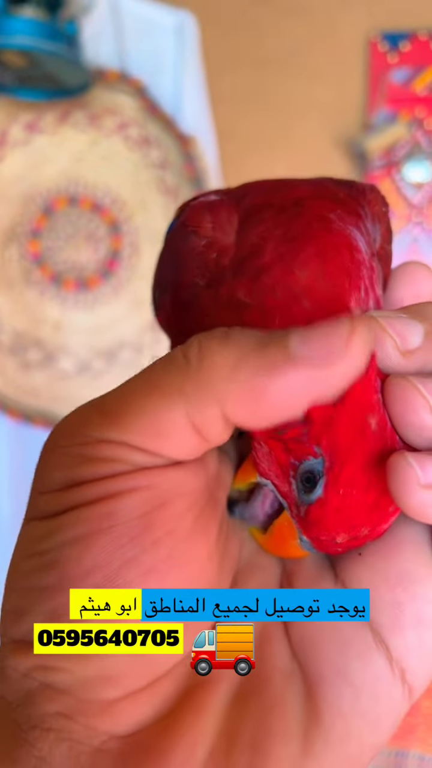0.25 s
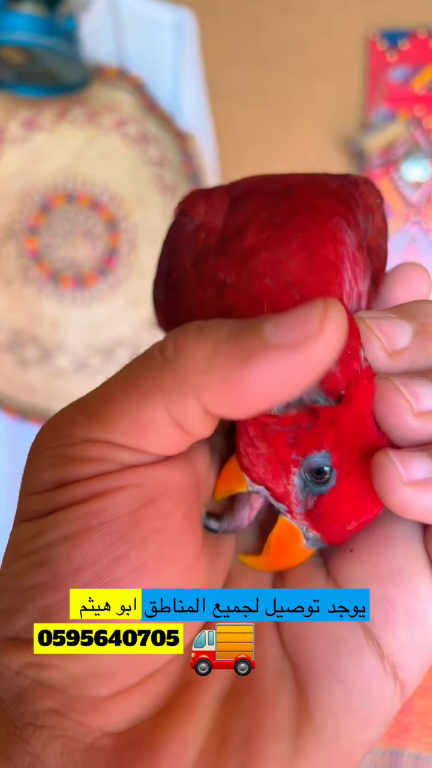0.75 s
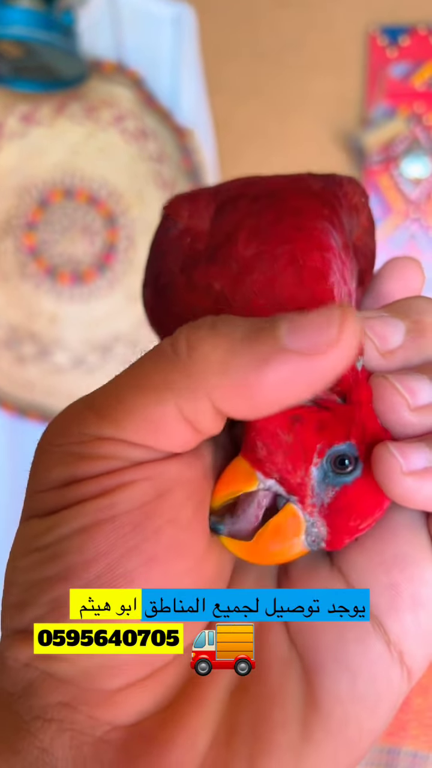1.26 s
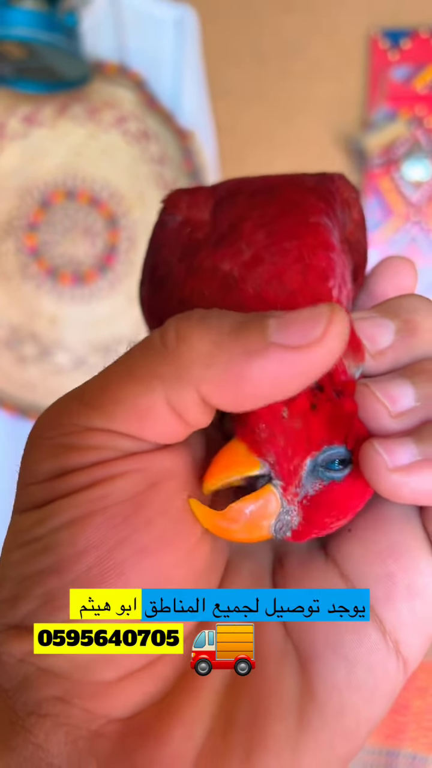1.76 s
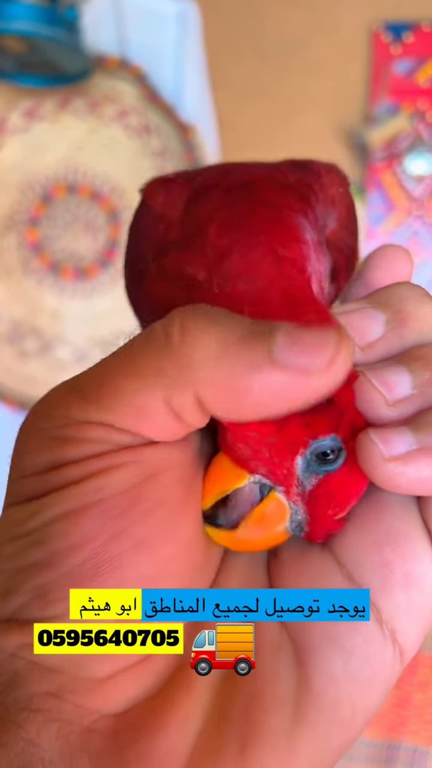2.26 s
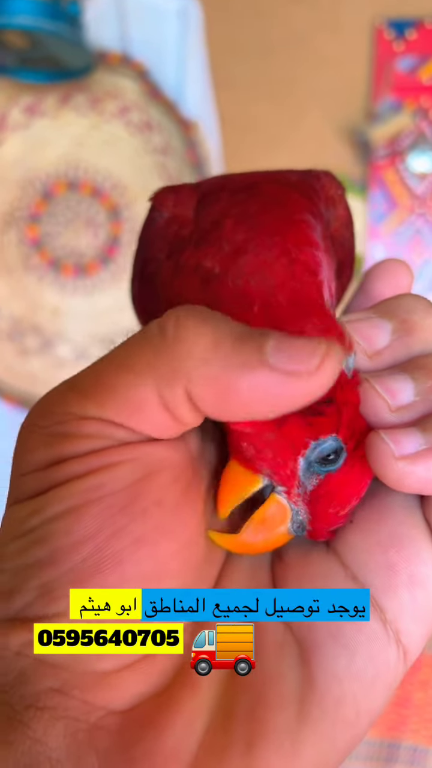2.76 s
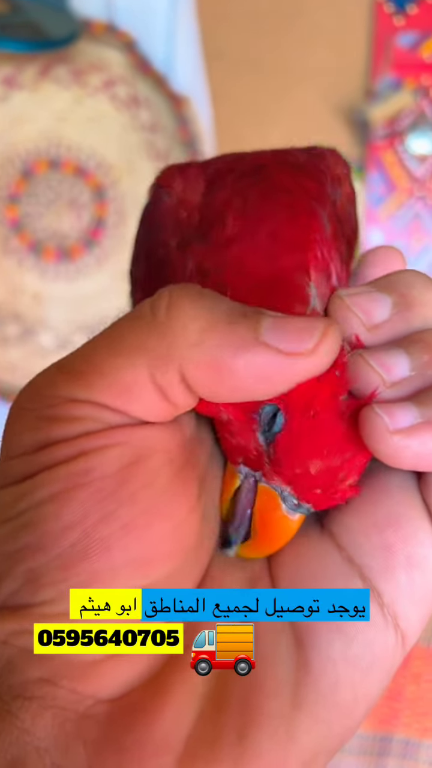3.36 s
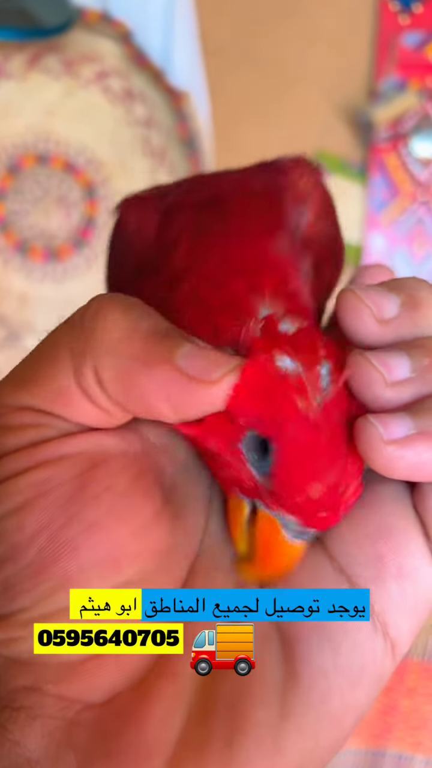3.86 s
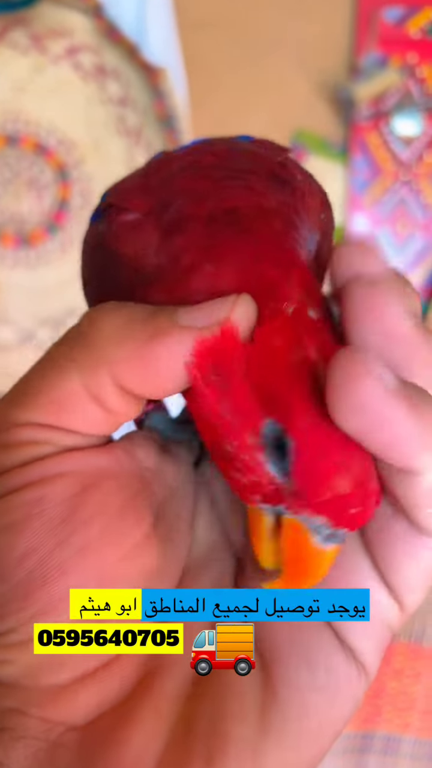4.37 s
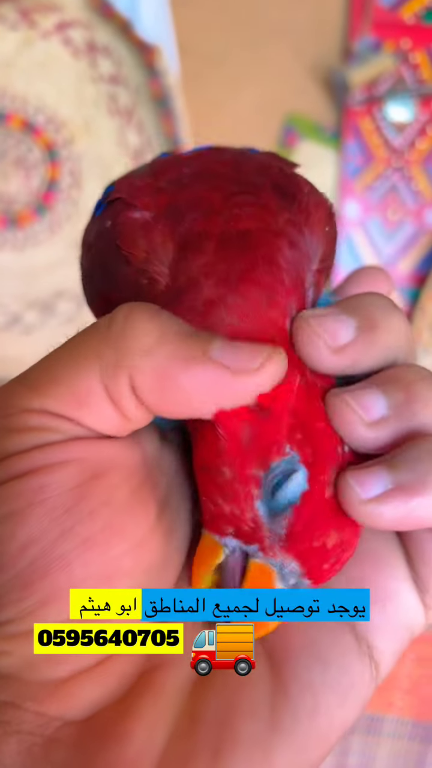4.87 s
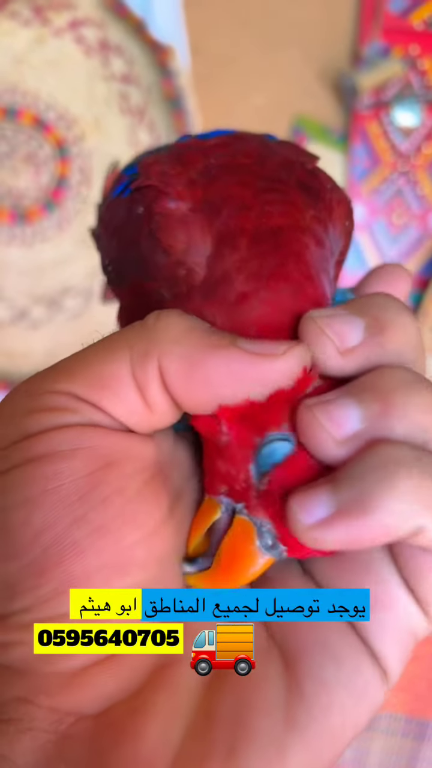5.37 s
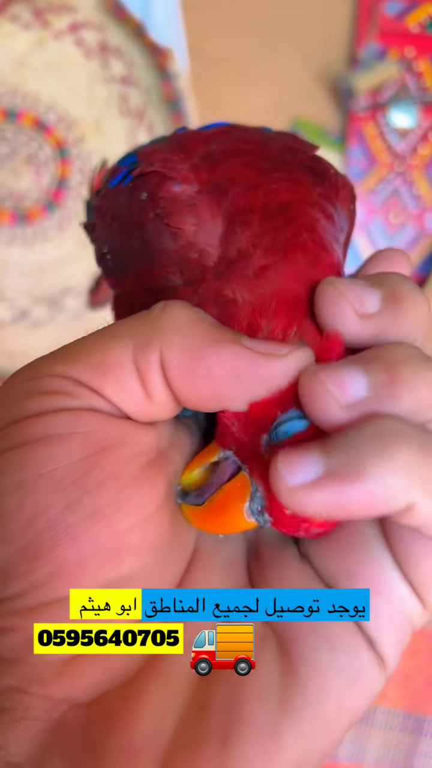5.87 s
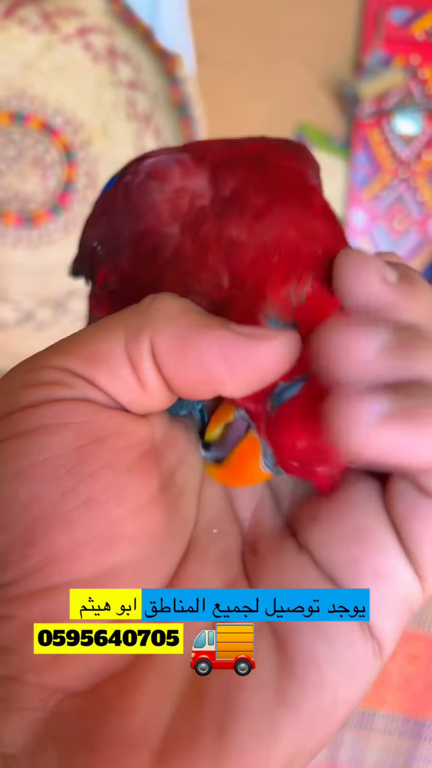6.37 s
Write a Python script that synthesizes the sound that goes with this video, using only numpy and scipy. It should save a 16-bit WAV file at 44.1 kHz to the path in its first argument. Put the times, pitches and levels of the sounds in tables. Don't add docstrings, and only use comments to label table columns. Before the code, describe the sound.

Close, loud and slightly thin on a phone: short raspy parrot calls, some breaking into a rough half-pitch, echo off hard room walls. After about two seconds of calling only fan rumble and one soft call remain, then rough cries and high squeals crowd together. Later shrieks come in a run, followed by soft handling thuds, light feather ticks and a final sharp screech.

```python
import sys
import numpy as np
from scipy import signal
from scipy.fft import rfft, irfft
from scipy.io import wavfile
from scipy.ndimage import uniform_filter1d

SR = 44100
rng = np.random.default_rng(int(sys.argv[2]) if len(sys.argv) > 2 else 0)


def attenuation_scalar(level_db):
    decades = np.asarray(level_db, float) / 20
    return 10 ** decades


def dump_mix(stems):
    frames = np.atleast_2d(stems).T
    limited = np.clip(frames, -1, 1)
    pcm = np.round(limited * 32767).astype(np.int16)
    wavfile.write(sys.argv[1], SR, pcm)


N = 292824
STEP = 32

# pitch_hz, level_db (per Hz)
RASP_TONE = [(350, -51.5), (600, -11), (1030, -16.5), (1280, -8), (1960, -3), (2440, -2.5), (3890, 3),
             (7110, -6), (8860, -21.5), (11500, -21), (16000, -48.5)]


def unit(x):
    return x / np.sqrt(np.mean(x ** 2))


def colour(x, points):
    hz, db = np.transpose(points)
    f = np.log(np.arange(len(x) // 2 + 1) * SR / len(x) + 1)
    return irfft(rfft(x) * attenuation_scalar(np.interp(f, np.log(hz), db)), len(x))


def band(x, lo_hz, hi_hz):
    return signal.sosfilt(signal.butter(2, [lo_hz, min(hi_hz, SR / 2.1)], "band", fs=SR, output="sos"), x)


def walk(rate_hz):
    once = band(rng.standard_normal(N), rate_hz / 2, rate_hz * 2)
    return unit(band(once, rate_hz / 2, rate_hz * 2))


def cooler():
    # pitch_hz, level_db (per Hz)
    air_tone = [(18, -14), (30, -6), (75, 0), (124, -16.5), (227, -17.5), (328, -20), (512, -20),
                (988, -30.5), (3140, -44.5), (3670, -53), (4780, -51.5), (7270, -50), (7870, -59),
                (13000, -52), (16000, -57.5)]
    # pitch_hz, level_db
    motor_lines = [(543.5, -56.5), (117.8, -52.5), (51.6, -46.5)]
    t = np.arange(N) / SR
    out = unit(colour(rng.standard_normal(N), air_tone)) * attenuation_scalar(-38 + 1.0 * walk(1.25))
    for hz, db in motor_lines:
        out = out + attenuation_scalar(db + 2 + 0.95 * walk(2.7)) * np.sin(2 * np.pi * hz * t)
    return out


def handling():
    # start_s, level_db, pitch_hz, t60_s
    finger_thuds = [(0.449, -36, 340, 0.29), (2.859, -31.5, 375, 0.095), (3.328, -38, 316.7, 0.19),
                    (3.888, -21, 423.6, 0.085), (4.219, -38.5, 500, 0.21), (5.314, -49, 450.4, 0.13),
                    (6.03, -25, 410, 0.071), (6.353, -36, 467.7, 0.13), (6.539, -36, 353, 0.2),
                    (6.6, -29, 293, 0.064)]
    # start_s, level_db, pitch_hz, t60_s
    skin_rubs = [
        (2.23, -49, 1280, 0.2),
        (2.329, -42.5, 1350, 0.16),
        (4.2, -37.5, 192, 0.38),
        (4.301, -41.5, 1303, 0.3),
        (6.02, -44.5, 1093, 0.3),
        (5.299, -23, 434, 0.093),
    ]
    # start_s, level_db
    shaft_ticks = [
        (5.4755, -34.5),
        (5.656, -34.5),
        (5.8628, -38.5),
        (5.9863, -44.5),
    ]
    out, t = np.zeros(N + SR), np.arange(SR // 2) / SR
    for s, db, hz, t60 in finger_thuds + skin_rubs:
        rub = unit(band(rng.standard_normal(len(t)), hz * 0.67, hz * 1.36))
        rub = rub * attenuation_scalar(-60 * t / max(t60, .02)) * np.minimum(t / 0.027, 1)
        out[int(s * SR):][:len(t)] += attenuation_scalar(db + 5.5) * rub
    for s, db in shaft_ticks:
        snap = unit(colour(rng.standard_normal(len(t)), [(3000, -24.0), (8000, -11), (10500, -0.5), (16000, -3)]))
        out[int(s * SR):][:len(t)] += attenuation_scalar(db) * snap * attenuation_scalar(-60 * t / 0.016)
    return out[:N]


def grunts():
    # start_s, length_s, pitch_hz, level_db
    low_notes = [(.2, 0.14, 765, -46), (1.55, 0.058, 1225, -46), (2.566, 0.049, 1395, -39.5),
                 (2.58, 0.076, 638, -42), (2.67, 0.049, 954, -38.5), (2.86, 0.061, 911, -44),
                 (3.1, 0.049, 967, -39.5), (3.87, 0.039, 724, -42.5), (4.04, 0.068, 938, -43),
                 (4.019, 0.081, 1211, -45.5), (3.325, 0.086, 801, -49), (4.9, 0.069, 850, -51),
                 (5.05, 0.043, 833, -49), (6.25, 0.083, 1086, -42.5)]
    out, waver = np.zeros(N), 1 + 0.074 * walk(82.0)
    for s, length, hz, db in low_notes:
        at = slice(int(s * SR), int((s + length) * SR))
        phase = np.cumsum(2 * np.pi * hz * waver[at] / SR)
        note = np.sin(phase) + 0.5 * np.sin(2 * phase)
        out[at] += attenuation_scalar(db + 8.5) * np.sqrt(np.hanning(len(phase))) * note
    return out


def pops():
    # start_s, level_db
    partings = [(0.0643, -26), (0.8737, -20.5), (1.1526, -14), (1.48, -17.5), (1.8043, -19.5),
                (4.4867, -14.5), (4.7481, -11.5), (5.0638, -9), (6.0022, -38), (6.2196, -41), (6.2392, -39)]
    out, t = np.zeros(N), np.arange(SR // 20) / SR
    for s, db in partings:
        puff = unit(colour(rng.standard_normal(len(t)), RASP_TONE))
        puff = puff * attenuation_scalar(-60 * t / 0.048) * np.minimum(t / 0.0054, 1)
        out[int(s * SR):][:len(t)] += attenuation_scalar(db - 4.5) * puff
    return out


def call(s, length, db, hz, last_hz, harsh_db, rule):
    t = np.arange(0, N + STEP, STEP) / SR - s
    rise = min(rule["attack_s"], length / 2)
    crest = rise + rule["crest"] * (length - rise)
    slip, slip_s, tail_s, onset_db = rule["slip"] * length, 0.09, .12, -35.5
    level = np.interp(t, [-rise, 0, rise, crest, length],
                      [-99, onset_db, -rule["swell_db"], 0, -rule["droop_db"]])
    level = db + level - rule["fall_db_s"] * np.maximum(t - length, 0)
    pitch = np.interp(t, [rise, length], [hz, last_hz])
    warble = np.interp(t, [rise, length], rule["warble"])
    half = harsh_db + np.interp(t, [slip, slip + slip_s], rule["half_db"])
    onset, hold, tail = rule["chaos_db"]
    chaos = np.interp(t, [0, rise, length, length + tail_s], [onset, hold + harsh_db, hold + harsh_db, tail])
    return [level, pitch, warble, rule["low_db"] + 0 * t, half, chaos]


def sagging(rows, rule):
    return [call(s, length, db, hz, hz * (1 - rule["sag"]), harsh_db, rule)
            for s, length, db, hz, harsh_db in rows]


def gliding(rows, rule):
    return [call(s, length, db, hz, last_hz, 19 * abs(np.log2(last_hz / hz)), rule)
            for s, length, db, hz, last_hz in rows]


def peeps():
    # start_s, length_s, level_db, first_hz, last_hz
    thin_notes = [
        (.775, 0.058, -38, 2265, 2000),
        (2.425, 0.045, -35, 2072, 2070),
        (2.721, 0.058, -31, 2045, 2073),
        (3.515, .08, -31.5, 2346, 2251),
        (4.97, .09, -26.5, 2120, 1698),
        (5.688, 0.048, -44.5, 2050, 2017),
    ]
    return gliding(thin_notes, dict(
        attack_s=.022, swell_db=2.5, crest=1, droop_db=1, fall_db_s=397, warble=(0.016, 0.039), low_db=-5,
        slip=.6, half_db=(-41, -30.5), chaos_db=(1, -18.5, 3)))


def rasps():
    # start_s, length_s, level_db, pitch_hz, harsh_db
    rough_calls = [(-.08, 0.098, -46.5, 2000, 4), (2.455, .09, -32, 1750, 9), (.51, .08, -21.5, 1800, -4.5),
                   (2.65, 0.081, -32.5, 1750, 16.5), (2.77, .16, -15, 2930, -2),
                   (3.185, .205, -19, 2400, 9.5), (3.585, 0.15, -19, 2700, -4.5),
                   (4.02, 0.17, -31, 1790, -5), (4.26, 0.094, -42.5, 2200, 5),
                   (5.24, 0.044, -20, 1880, -6.5), (6.215, 0.11, -29.5, 2270, -7),
                   (6.53, 0.091, -30.5, 2280, -7)]
    return sagging(rough_calls, dict(
        attack_s=.03, swell_db=3.5, crest=.75, droop_db=2, fall_db_s=216, sag=.03, warble=(.055, 0.073), low_db=-8,
        slip=0.26, half_db=(-1.5, -1), chaos_db=(29, 6.5, -5)))


def screeches():
    # start_s, length_s, level_db, pitch_hz, harsh_db
    hard_calls = [
        (.24, .105, -16, 2290, 2),
        (6.416, .065, -11.5, 2332, -0.5),
    ]
    return sagging(hard_calls, dict(
        attack_s=0.023, swell_db=9.5, crest=0.64, droop_db=2.5, fall_db_s=243, sag=.01, warble=(0.039, 0.042),
        low_db=-40, slip=0.16, half_db=(1, -4.5), chaos_db=(7.5, -7.5, -12)))


def squawks():
    # start_s, length_s, level_db, pitch_hz, harsh_db
    swelling_calls = [
        (.125, 0.067, -21, 1898, 12),
        (.585, 0.066, -12.5, 1885, 1),
        (.872, 0.15, -12.5, 2000, 6.5),
        (1.148, .13, -12.5, 1951, 2),
        (2.145, .075, -31, 2230, 7.5),
        (5.995, .12, -34, 1950, 12),
    ]
    return sagging(swelling_calls, dict(
        attack_s=.035, swell_db=6, crest=0.82, droop_db=3, fall_db_s=234.5, sag=.055, warble=(0.048, .028),
        low_db=-6.5, slip=0.77, half_db=(-24.5, -12), chaos_db=(16.5, -19, -4.5)))


def cries():
    # start_s, length_s, level_db, pitch_hz, harsh_db
    breaking_calls = [
        (.398, .115, -13.5, 1953, 2),
        (1.468, .14, -11.5, 2010, -1),
        (1.793, .11, -14, 2022, -5.5),
    ]
    return sagging(breaking_calls, dict(
        attack_s=.035, swell_db=5.5, crest=.6, droop_db=3.5, fall_db_s=237, sag=.045, warble=(.024, .034),
        low_db=-7.5, slip=0.31, half_db=(-39.5, -6.5), chaos_db=(6.5, -13, -11)))


def shrieks():
    # start_s, length_s, level_db, pitch_hz, harsh_db
    forced_calls = [
        (3.125, 0.055, -11, 2074, 11.5),
        (3.9, .1, -16, 1981, 6),
        (4.48, 0.14, -11.5, 2000, 2),
        (4.74, .165, -12, 2104, 2),
        (5.06, 0.16, -11, 2079, 0),
    ]
    return sagging(forced_calls, dict(
        attack_s=.028, swell_db=2, crest=.75, droop_db=1.5, fall_db_s=236.5, sag=.04, warble=(0.063, 0.057),
        low_db=-10, slip=.45, half_db=(-22, -12), chaos_db=(6.5, -19.5, 4.5)))


def yells():
    # start_s, length_s, level_db, pitch_hz, harsh_db
    climbing_calls = [
        (.05, .095, -27.5, 1604, 10),
        (2.53, .075, -21.5, 1958, 14),
        (3.05, .095, -16, 2010, -1),
        (3.65, .235, -13, 2000, -3.5),
    ]
    return sagging(climbing_calls, dict(
        attack_s=.03, swell_db=7, crest=.9, droop_db=1, fall_db_s=241, sag=-.065, warble=(.06, 0.056),
        low_db=-5.5, slip=0.4, half_db=(-7.5, -19.5), chaos_db=(6, -6, 8.5)))


def squeals():
    # start_s, length_s, level_db, first_hz, last_hz
    high_calls = [
        (2.76, 0.052, -18, 3370, 3110),
        (2.91, .085, -15, 2999, 3620),
        (2.985, .07, -11, 3490, 3600),
        (6.41, 0.023, -21.5, 3458, 3730),
    ]
    return gliding(high_calls, dict(
        attack_s=.018, swell_db=2.5, crest=.85, droop_db=1.5, fall_db_s=304, warble=(0.037, 0.029), low_db=-4.5,
        slip=0.71, half_db=(-13, -28), chaos_db=(-6, -20.5, -9.5)))


def syrinx():
    jump_s, change_s = .003, .012
    calls = squawks() + cries() + shrieks() + yells() + rasps() + screeches() + peeps() + squeals()
    calls = np.array(calls)
    loudest = calls[:, 0].argmax(axis=0)
    state = np.take_along_axis(calls, loudest[None, None], axis=0)[0]
    state[0] = 10 * np.log10(np.sum(attenuation_scalar(2 * calls[:, 0]), axis=0))
    state[1] = uniform_filter1d(state[1], size=max(int(jump_s * SR / STEP), 1))
    state[2:] = uniform_filter1d(state[2:], size=int(change_s * SR / STEP), axis=1)
    return [np.interp(np.arange(N) / STEP, np.arange(len(row)), row) for row in state]


def stack(phase, hz, order):
    return np.cos(order * phase + order * order) * (order * hz < 17000)


def torn(x, patchy_db, rate_hz):
    edges = 500 * 2 ** np.arange(0, 5.6, .5)
    return sum(attenuation_scalar(patchy_db * walk(rate_hz)) * band(x, lo, hi) for lo, hi in zip(edges, edges[1:]))


def warbling_tones(hz, warble, low_db, half_db):
    # pitch_hz, level_db
    throat_tone = [(500, -59), (1100, -19.5), (2000, -5), (3000, -1), (3800, 2), (4800, -3.5), (5700, -5.5),
                   (7500, -11), (8600, -18), (9500, -16.5), (12000, -18), (16000, -25)]
    flap = np.cumsum(2 * np.pi * 73. * (1 + 0.1818 * walk(12.)) / SR)
    pull = np.sin(flap) + .3 * np.sin(2 * flap) + .2 * np.cos(2 * flap) + .12 * walk(120.)
    phase = np.cumsum(np.pi * hz * (1 + warble * pull) / SR)
    low_db = np.where(hz > 2700, -8, low_db)
    main = attenuation_scalar(low_db + 7.0) * stack(phase, hz / 2, order=2)
    main = main + sum(stack(phase, hz / 2, order=k) for k in range(4, 18, 2))
    under = attenuation_scalar(np.where(hz > 2600, -12, -3)) * stack(phase, hz / 2, order=1)
    half = under + sum(stack(phase, hz / 2, order=k) for k in range(3, 18, 2))
    half = half * attenuation_scalar(2.9 * walk(37.0))
    return unit(colour(main + attenuation_scalar(half_db) * half, throat_tone)) * attenuation_scalar(2.83 * walk(80.))


def chaotic_rasp(hz):
    lurch = hz / 2 * (1 + .16 * np.tanh(walk(45.)) + .08 * walk(200.))
    wild = np.cumsum(2 * np.pi * lurch / SR)
    rasp = colour(sum(stack(wild, lurch, order=k) for k in range(1, 18)), RASP_TONE)
    return unit(torn(rasp, patchy_db=3.5, rate_hz=14.))


def beak(voice, db, half_db, chaos_db):
    upper = colour(voice, [(4600, -60.5), (5300, -1.5)])
    soft_db = 0.026 * np.minimum(chaos_db, 0) * np.maximum(-24.5 - db, 0)
    upper_db = np.clip(0.26 * (db + 18) + soft_db, -30, 4)
    voice = voice + (attenuation_scalar(upper_db) - 1) * upper
    air_db = -19 + 0.07 * (db + 5.5) + 1.2 * attenuation_scalar(np.minimum(half_db, 0)) + 0.13 * np.clip(chaos_db, -15, 8)
    air = colour(voice, [(7900, -66.5), (8600, 2.0)])
    return voice + (attenuation_scalar(air_db + 20.0) - 1) * air


def parrot():
    db, hz, warble, low_db, half_db, chaos_db = syrinx()
    voice = warbling_tones(hz, warble, low_db, half_db) + attenuation_scalar(chaos_db) * chaotic_rasp(hz)
    voice = voice / np.sqrt(1 + attenuation_scalar(2 * chaos_db))
    return attenuation_scalar(db - 1.0) * beak(voice, db, half_db, chaos_db)


def room(x):
    # pitch_hz, t60_s, level_db
    wall_echo = [(300, 0.49, 0.5), (2000, 0.27, 4), (5070, 0.16, 3.5), (11700, 0.23, 2.5)]
    room_db = -3
    t, tail = np.arange(SR // 2) / SR, 0
    room_hz, t60s, dbs = np.transpose(wall_echo)
    for hz in 125 * 2. ** np.arange(8):
        fade_db = np.interp(hz, room_hz, dbs) - 60 * t / np.interp(hz, room_hz, t60s)
        octave = band(rng.standard_normal(len(t)), hz / np.sqrt(2), hz * np.sqrt(2))
        tail = tail + octave * attenuation_scalar(fade_db)
    tail = tail * (t > .003)
    return x + attenuation_scalar(room_db) * signal.fftconvolve(x, tail / np.sqrt(np.sum(tail ** 2)))[:N]


def scene():
    return (room(parrot() + pops() + grunts() + handling()) + cooler())[None]


def starve(x, under_db, spread, thrift):
    spec = signal.stft(x, nperseg=2048)[2]
    edges = np.unique(np.round(100 * 1.04 ** np.arange(56)).astype(int))
    widths = np.diff(edges, append=len(spec))
    power = np.add.reduceat(np.abs(spec) ** 2, edges, axis=0) / widths[:, None]
    db = 10 * np.log10(power + 1e-20)
    number = np.arange(len(edges))
    steps = number[:, None] - number
    fall = spread * np.where(steps > 0, steps, -3 * steps)
    mask = np.max(db[None] - fall[:, :, None], axis=1) - under_db + thrift * number[:, None]
    mask = mask + 6 * uniform_filter1d(rng.standard_normal(db.shape), size=4)
    mask = mask + .3 * (db.max(0) - db.max() + 12)
    spec[edges[0]:] *= np.repeat(db > mask, widths, axis=0)
    return signal.istft(spec, nperseg=2048)[1][:N]


def band_limit(x):
    return signal.sosfilt(signal.butter(12, 16520, fs=SR, output="sos"), x)


def record(dry):
    rounded = dry / (1 + dry ** 6) ** (1 / 6)
    top = signal.ellip(10, .2, 60, 16100, fs=SR, output="sos")
    thin = starve(signal.sosfilt(top, rounded[0]), under_db=28, spread=.6, thrift=.24)
    return band_limit(thin[None])


dry = scene()
out = record(dry)
dump_mix(out)
```